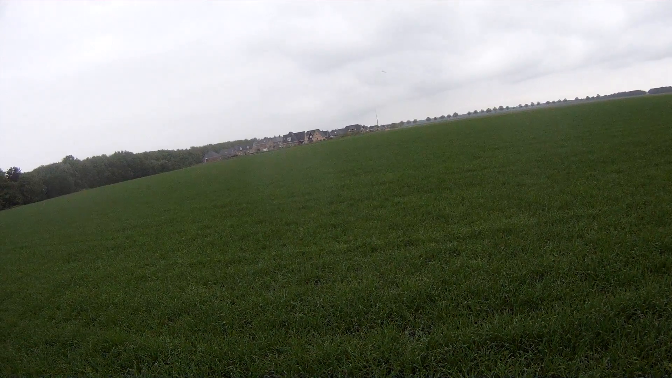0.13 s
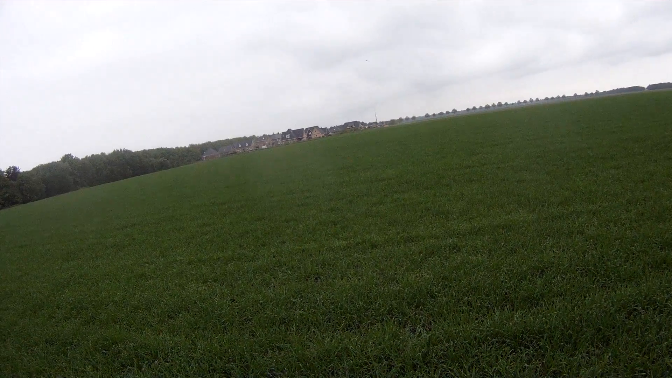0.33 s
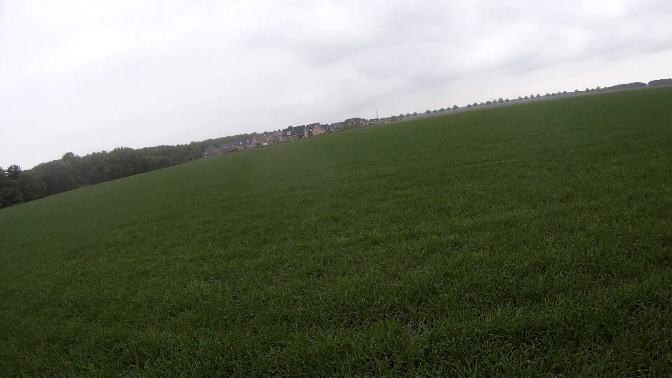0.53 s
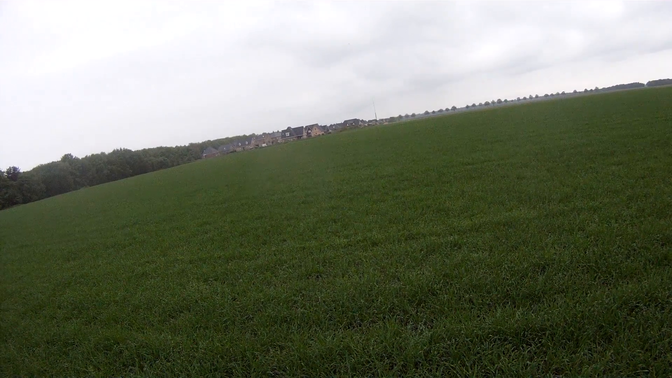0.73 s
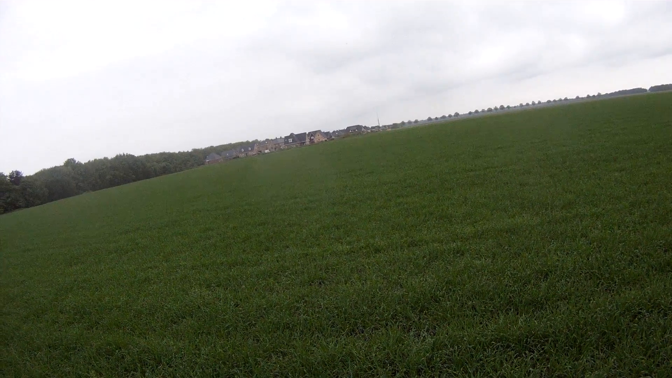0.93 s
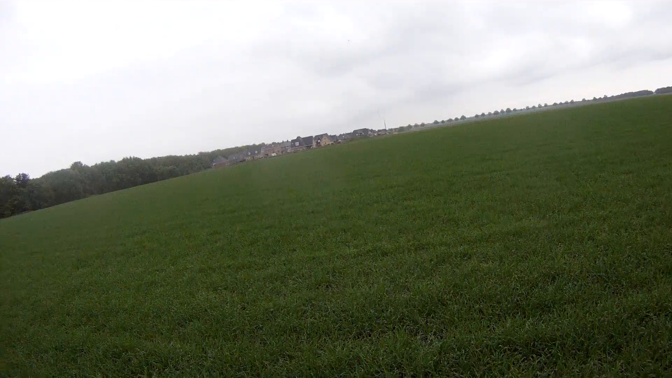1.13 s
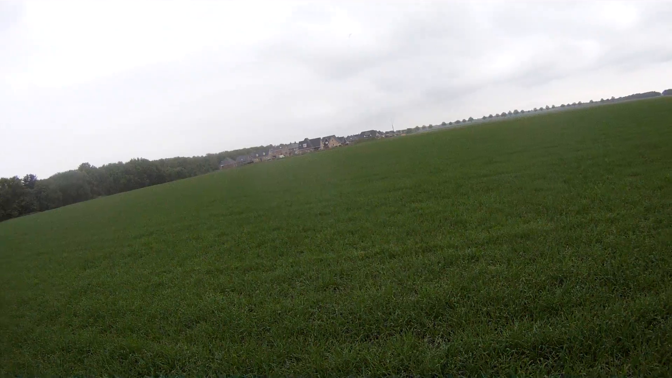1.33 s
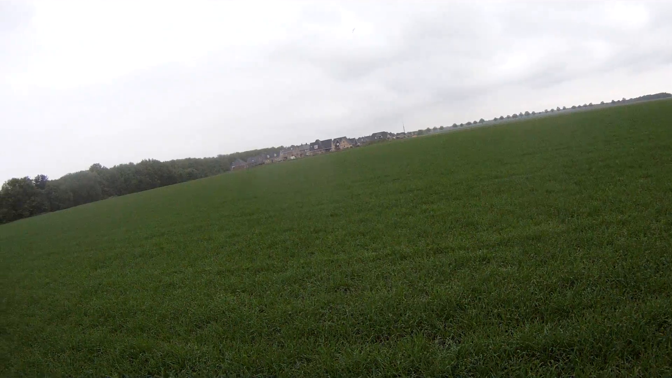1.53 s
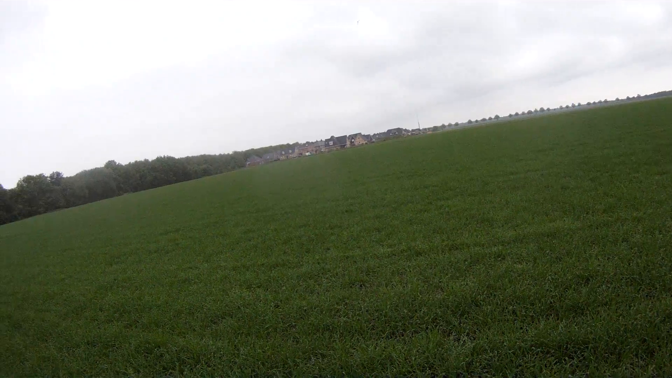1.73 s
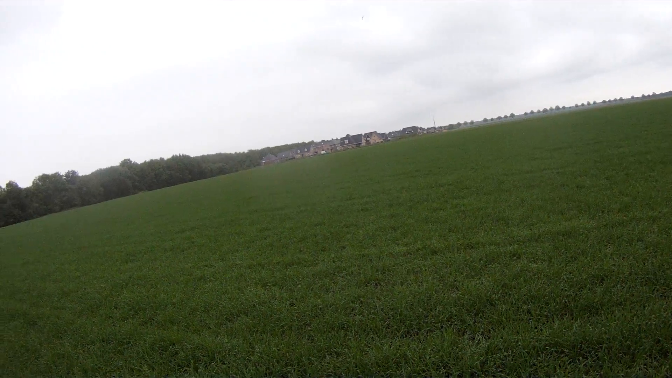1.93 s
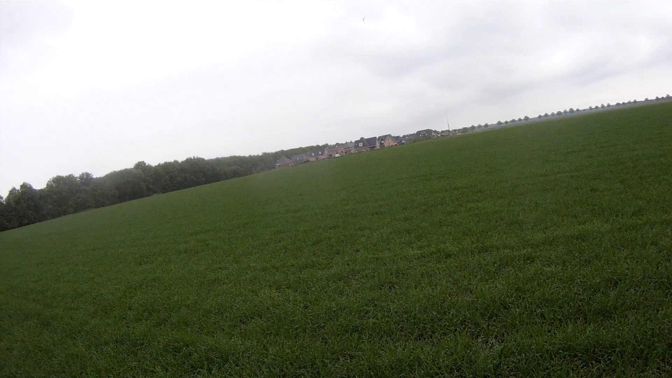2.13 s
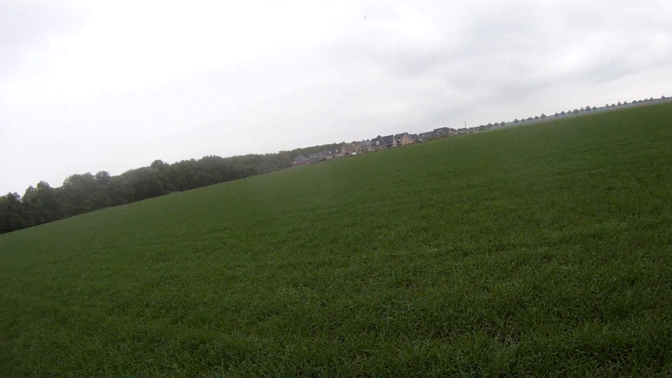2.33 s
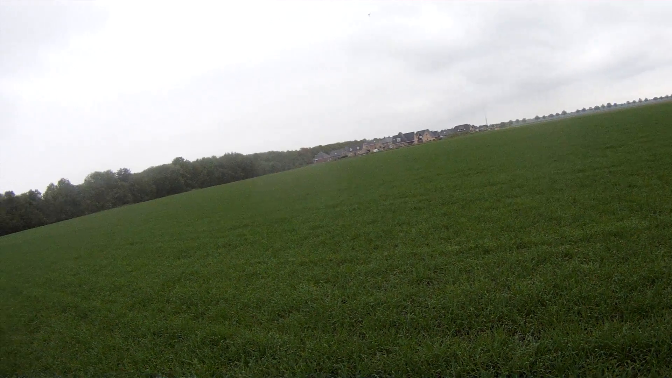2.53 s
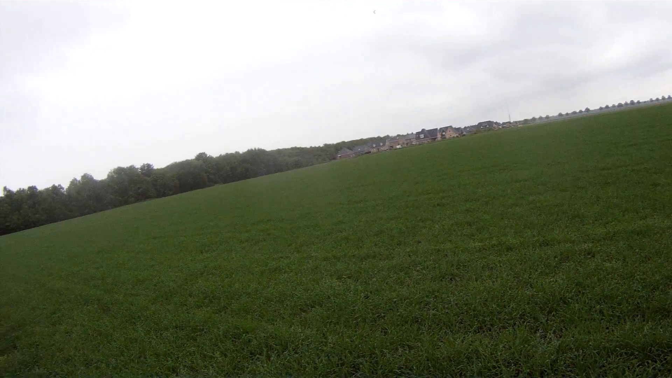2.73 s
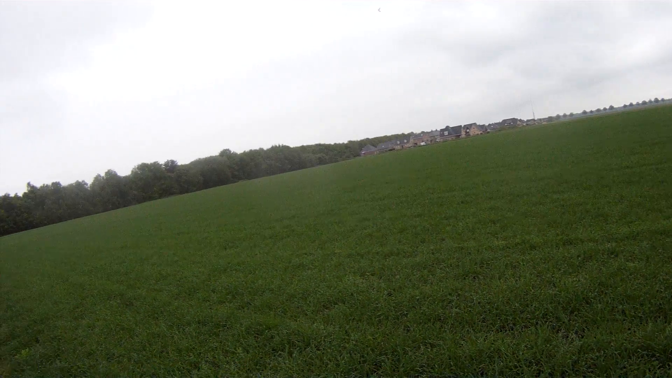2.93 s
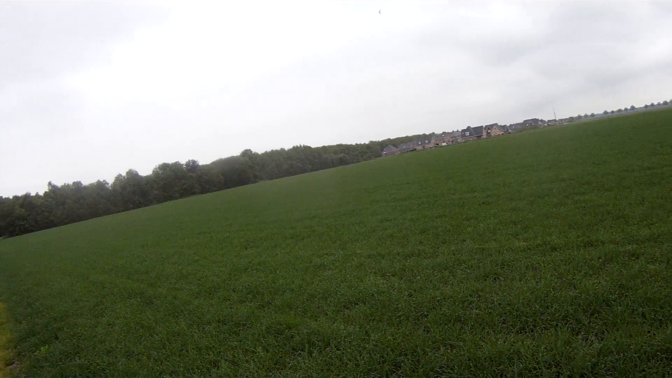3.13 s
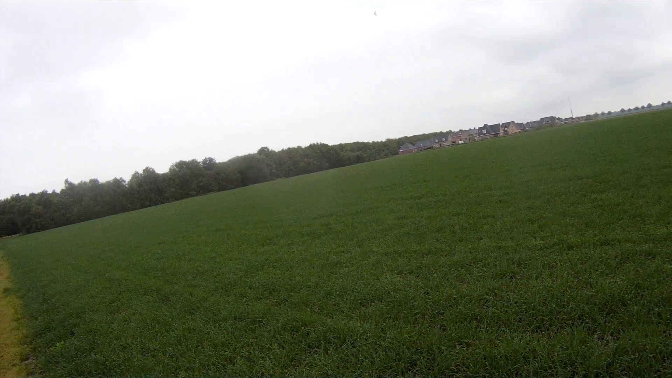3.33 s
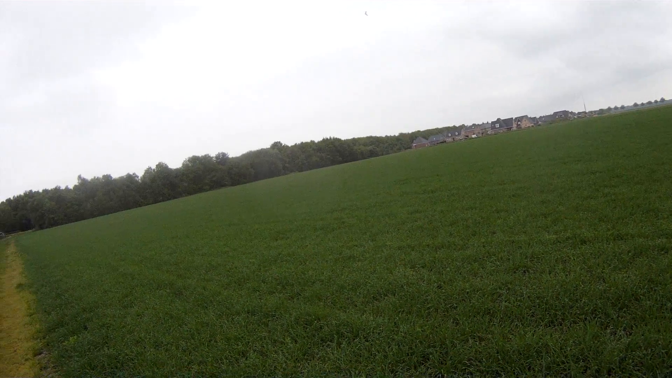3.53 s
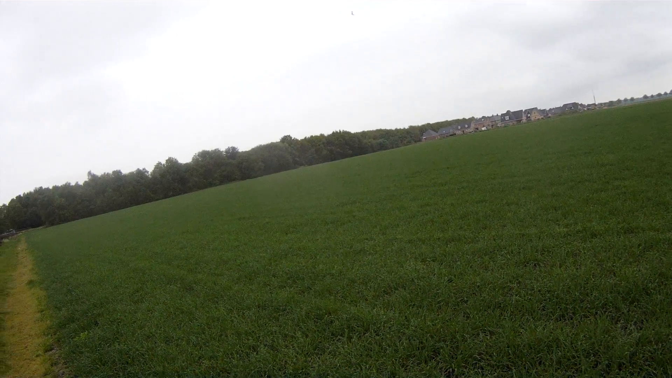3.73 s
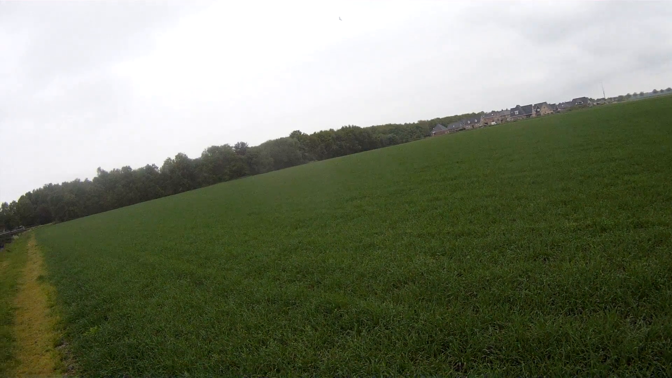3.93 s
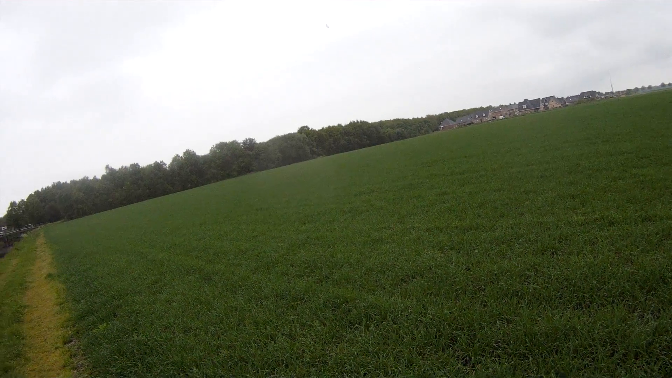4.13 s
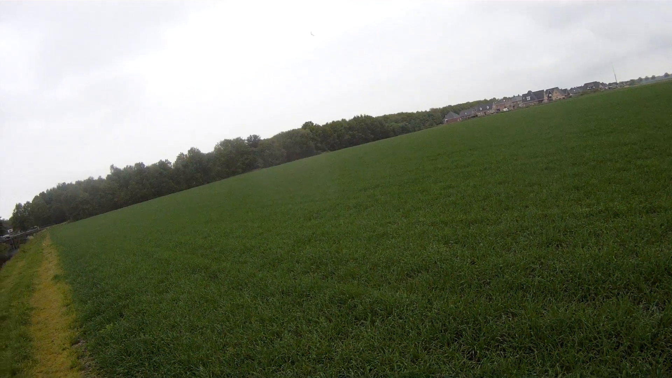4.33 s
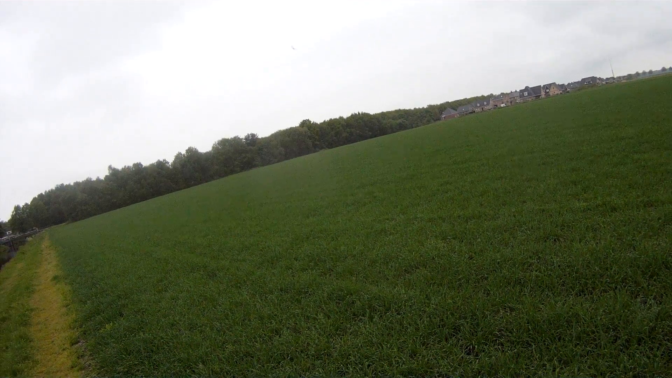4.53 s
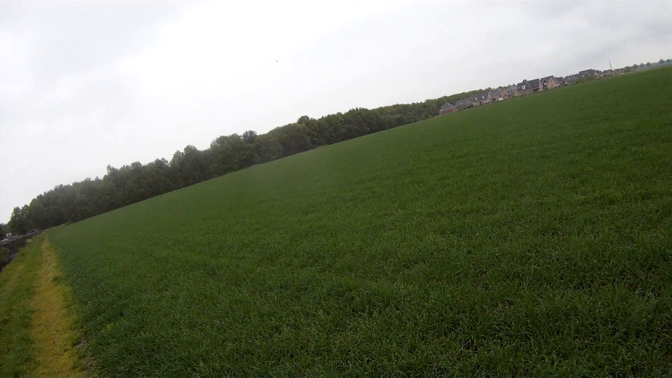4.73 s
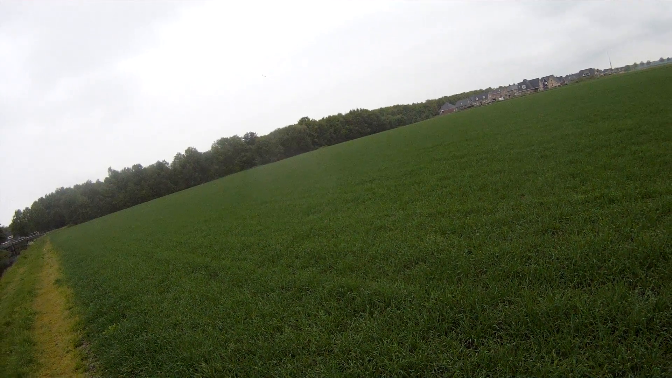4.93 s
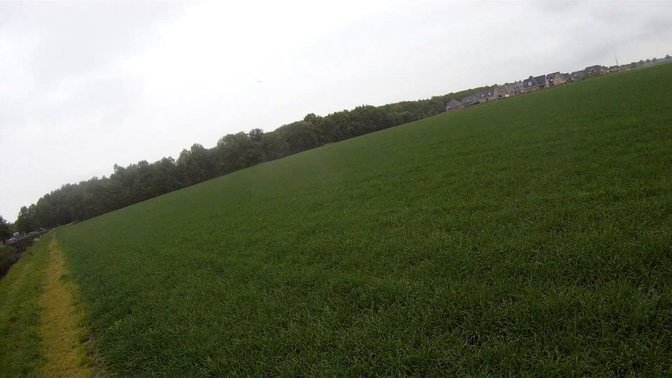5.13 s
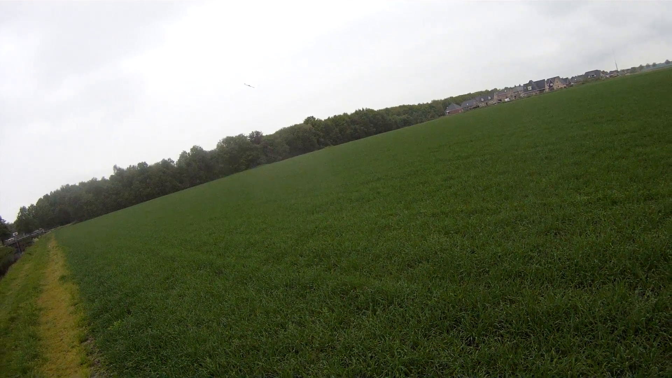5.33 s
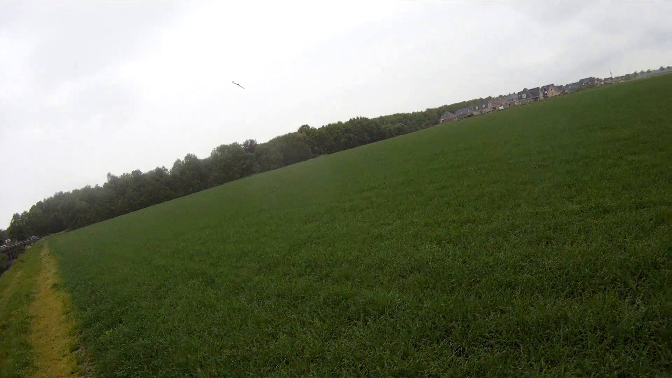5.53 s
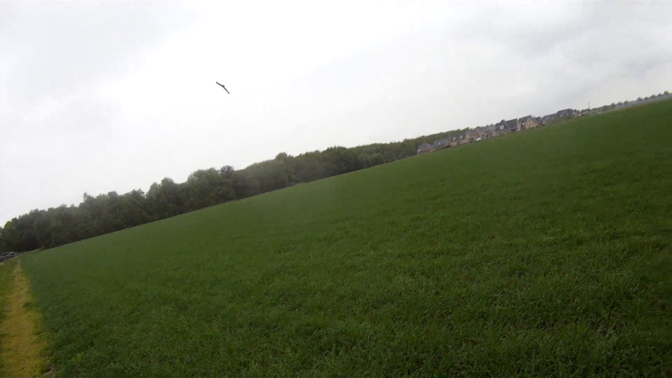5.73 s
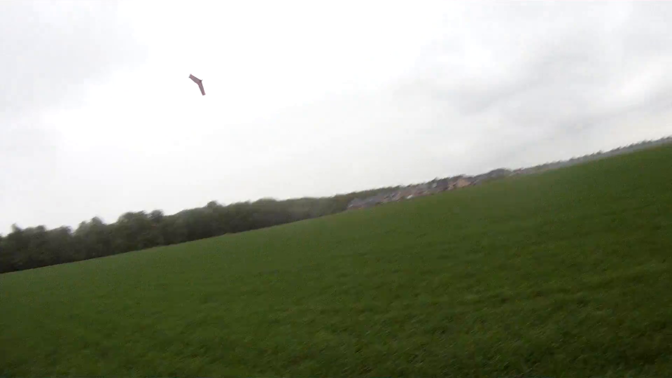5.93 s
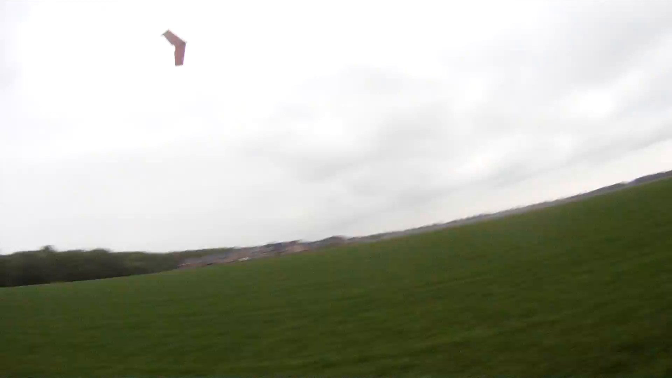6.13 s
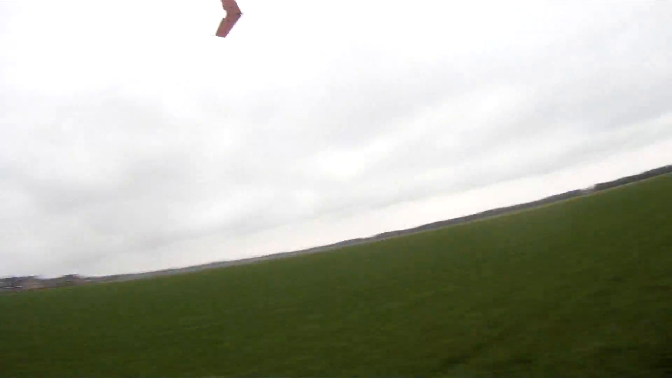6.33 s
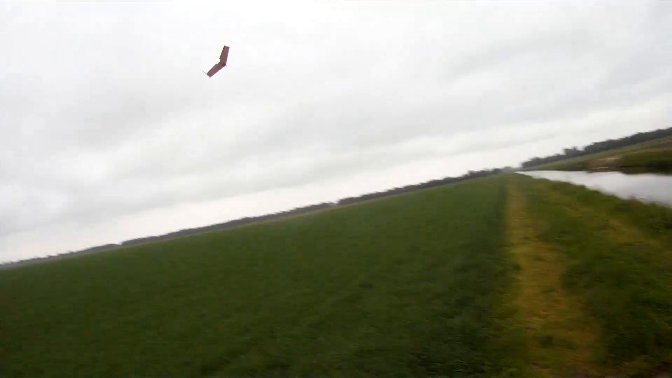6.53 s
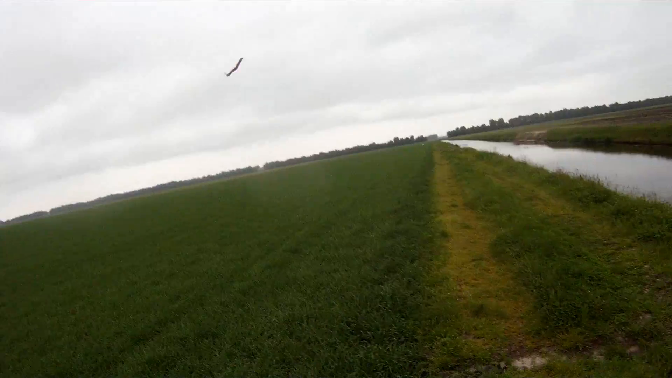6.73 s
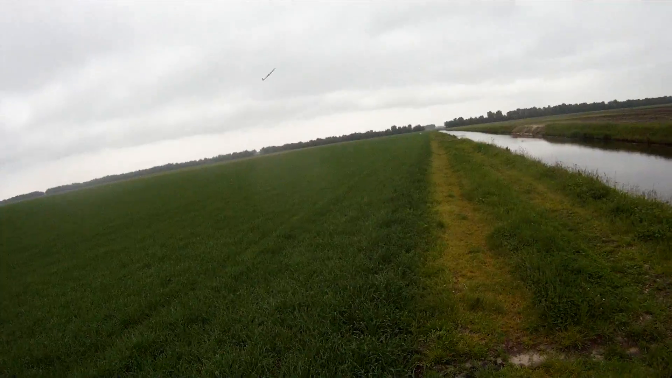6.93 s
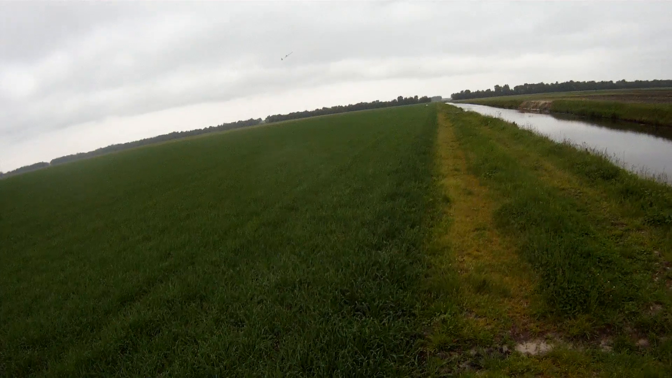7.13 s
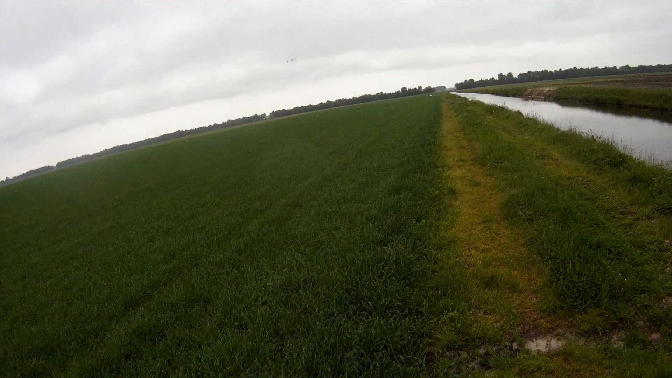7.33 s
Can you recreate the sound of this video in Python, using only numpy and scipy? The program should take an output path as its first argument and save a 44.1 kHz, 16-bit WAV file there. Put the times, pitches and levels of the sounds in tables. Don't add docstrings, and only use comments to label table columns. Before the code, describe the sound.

A far model plane engine drones nasally and waveringly, with a very faint bird whistle around two seconds. The buzz climbs and brightens as the plane approaches, rushes closely overhead with airy hiss, then falls duller and quieter. Dull wind thumps hit the small camera microphone in the open, with coarse metallic treble and no room echo.

```python
import sys
import numpy as np
from scipy import signal
from scipy.fft import rfft, irfft, next_fast_len
from scipy.io import wavfile
from scipy.ndimage import uniform_filter1d, map_coordinates

SR = 44100
rng = np.random.default_rng(int(sys.argv[2]) if len(sys.argv) > 2 else 0)


def wav_record(signal):
    frames = np.transpose(np.atleast_2d(signal))
    bounded = np.clip(frames, -1, 1)
    quanta = np.round(bounded * 32767).astype(np.int16)
    wavfile.write(sys.argv[1], SR, quanta)


def voltage_ratio(decibels):
    exponent = np.asarray(decibels, float) / 20
    return 10 ** exponent


N = 324576
STEP = 64
FAR_DB = -41

# [t/s, level/dB]
BUZZ_LEVEL = [(0.0, -40.5), (0.49, -40.5), (0.63, -44.5), (2.01, -40.5), (2.89, -44), (3.03, -50.5),
              (3.4, -41), (3.65, -42), (4.14, -40), (4.37, -45), (4.53, -40.5), (5.14, -36), (6.31, -21),
              (6.35, -23), (6.79, -27), (7.07, -35), (7.26, -34.5), (7.36, -38.5)]
# [t/s, lag/firing periods, strength/0-1]
GROUND_BOUNCE = [(0, .52, .6), (1.9, .83, .7), (2.1, .88, .65), (2.6, .89, .6), (3.25, .97, .35),
                 (4.35, .975, .55), (4.9, .81, .6), (5.1, .72, .45), (5.55, .84, .55), (5.88, 1.22, .6),
                 (6.02, 1.5, .5), (6.19, 1.86, .5), (6.28, 1.93, .6), (6.37, 1.8, .5), (6.6, 1.26, .45),
                 (6.75, 1, .6), (7, .66, .7), (7.36, .48, .7)]


def unit(x):
    return x / np.sqrt(np.mean(x ** 2) + 1e-20)


def along(points, hz):
    f, v = np.transpose(points)
    return np.interp(np.log(hz + 1), np.log(f + 1), v)


def curves(rows):
    s, *cols = np.transpose(rows)
    return [np.interp(np.arange(N) / SR, s, c) for c in cols]


def wobble(rate):
    knots = rng.standard_normal(int(N * rate / SR) + 4)
    return map_coordinates(knots, [np.arange(N) * rate / SR])


def bumps(rows, height=lambda row: row[1]):
    t = np.arange(0, N, STEP) / SR
    swell = sum(height(r) * np.exp(-((t - r[0]) / r[2]) ** 2) for r in rows)
    return np.interp(np.arange(N), t * SR, swell)


def coloured(x, spectrum):
    m = next_fast_len(N + 8192)
    gain = voltage_ratio(along(spectrum, np.fft.rfftfreq(m, 1 / SR)))
    return irfft(rfft(x, m) * gain, m)[:N]


def rush(spectrum):
    return unit(coloured(rng.standard_normal(N), spectrum))


def field():
    # [f/Hz, level/dB per Hz]
    murmur = [(100, 0), (250, -4), (500, 7.5), (800, 0.5), (1200, -20), (3000, -22), (5500, -22)]
    # [t/s, level/dB]
    murmur_level = [(0, -56.5), (1, -60), (2.3, -57.5), (3.3, -61.5), (5, -60), (7.36, -55.5)]
    # [f/Hz, level/dB per Hz]
    drone = [(40, -32), (65, -5), (78, 6), (92, -6), (140, -25)]
    murmur_db = curves(murmur_level)[0] + 0.6 * wobble(2.74)
    drone_db = -55.5 + 3.8 * wobble(2.316)
    return voltage_ratio(murmur_db) * rush(murmur) + voltage_ratio(drone_db) * rush(drone)


def bird():
    # [t/s, f/Hz, level/dB]
    chirp = [
        (2.06, 2180, -85),
        (2.1, 2190, -68),
        (2.2, 2215, -55),
        (2.225, 2214, -73),
        (2.235, 2215, -95),
    ]
    hz, db = curves(chirp)
    return voltage_ratio(db) * np.sin(2 * np.pi * np.cumsum(hz) / SR)


def wind():
    # [f/Hz, level/dB per Hz]
    buffet_colour = [(15, -4), (30, 1), (80, 2), (120, -17.5), (200, -25.5), (400, -40)]
    # [f/Hz, level/dB per Hz]
    flutter_colour = [(60, -45), (110, 6), (170, -4), (220, -13.5), (400, -33), (1200, -65)]
    # [t/s, buffet level/dB, flutter over buffet/dB]
    breeze_level = [(0, -49, -12), (1.5, -54.5, -10.5), (2.5, -53, -14), (4.5, -48.5, -10.5),
                    (6.3, -50.5, -12.5), (7.36, -43, -5.5)]
    # [t/s, buffet level/dB, half length/s, flutter over buffet/dB]
    gusts = [(0.279, -34, 0.022, -13), (0.474, -58, 0.021, -21), (0.752, -48.5, 0.017, -28),
             (2.6, -53, 0.044, -11), (2.95, -53, .06, -19), (3.103, -44, 0.02, -12.5),
             (3.172, -47, 0.035, -1), (3.26, -40, 0.049, -4.5), (3.42, -43.5, 0.057, -10.5),
             (3.61, -47.5, 0.019, -22), (4.029, -34, 0.038, -10.5), (4.115, -38, 0.036, 2.5),
             (4.194, -42.5, 0.068, -8), (4.713, -50, 0.023, -16), (4.958, -45, .03, -12),
             (5.124, -35.5, 0.037, -6.5), (5.434, -49, 0.089, -4), (5.72, -45, 0.14, -3.5),
             (5.848, -39.5, 0.046, -17), (6.407, -36.5, .02, -9), (6.563, -47, 0.021, -3),
             (6.621, -37.5, .015, -18.5), (6.72, -34, 0.035, -24), (6.823, -39, .03, -20),
             (6.93, -32.5, 0.062, -16), (7.092, -37, 0.036, -9), (7.202, -37.5, 0.021, -13),
             (7.315, -38, 0.066, -12.5)]
    breeze_db, flutter_db = curves(breeze_level)
    breeze = voltage_ratio(breeze_db + 1.6 * wobble(11))
    lumps = 1.2 * wobble(13)
    buffet = unit(voltage_ratio(lumps) * rush(buffet_colour))
    flutter = unit(voltage_ratio(lumps + 2.5 * wobble(30)) * rush(flutter_colour))
    buffet_gain = breeze + bumps(gusts, lambda gust: voltage_ratio(gust[1]))
    flutter_gain = breeze * voltage_ratio(flutter_db) + bumps(gusts, lambda gust: voltage_ratio(gust[1] + gust[3]))
    return buffet_gain * buffet + flutter_gain * flutter


def airframe():
    # [f/Hz, level/dB per Hz]
    whoosh = [(200, -3), (400, 3), (700, 7.5), (1100, -11), (2500, 6), (4000, 18), (5500, -9.5)]
    near_db = uniform_filter1d(curves(BUZZ_LEVEL)[0], size=SR // 4) - FAR_DB
    return voltage_ratio(-66 + 1.62 * near_db + 0.81 * wobble(5.3)) * rush(whoosh)


def shaft(hz):
    # [t/s, share of the pulse lost, delay/periods]
    misfires = [
        (5.165, .35, .03),
        (5.345, .15, .012),
        (6.98, .45, .05),
        (7.011, .5, .07),
    ]
    t = np.arange(N) / SR
    turns = np.cumsum(hz) / SR + .003 * wobble(60) + .006 * wobble(8)
    strength = voltage_ratio(0.59 * wobble(120))
    for s, lost, late in misfires:
        u = (t - s) / 0.0016  # s, about one pulse
        strength *= 1 - lost * np.exp(-u ** 2)
        turns -= late * (1 + np.tanh(u)) / 2
    return turns, strength


def eddies(shape, depth_db, turn, rate):
    knots = rng.standard_normal((2 * shape[0], int(N * rate / SR) + 4))
    where = np.arange(shape[1]) * STEP * rate / SR
    level, phase = np.split(np.array([map_coordinates(k, [where]) for k in knots]), 2)
    return voltage_ratio(depth_db * level) * np.exp(1j * turn * phase)


def exhaust(hz, turns, buzz_db, treble_db):
    # [f/Hz, level/dB]
    silencer = [(900, -49), (1250, -13), (1600, -11), (1880, -7), (2130, 3.5), (2380, -0.5), (2620, -4.5),
                (2870, -3.5), (3150, -1), (3500, -4.5), (4000, -5), (4600, -11), (5200, -12.5),
                (6000, -19.5)]
    # [delay/ms, gain]
    pipe = [(1.1, .12), (1.7, .2), (.45, .12)]
    # [f/Hz, level/dB]
    grass = [(1000, 1.5), (2500, -.5), (5500, -5)]
    lag, share = (c[::STEP] for c in curves(GROUND_BOUNCE))
    order = np.arange(5, 27)[:, None]
    f = order * hz[::STEP]
    echoes = sum(g * np.exp(-2j * np.pi * f * ms / 1000) for ms, g in pipe)
    gain = voltage_ratio(along(silencer, f)) * (1 + echoes)
    bounce = share * voltage_ratio(along(grass, f)) * np.exp(-2j * np.pi * order * lag)
    gain = gain * (1 + bounce * eddies(f.shape, 2.5, .55, 7))
    gain = gain * eddies(f.shape, 1.3, .7, 1.5) * eddies(f.shape, 1.9, .18, 12)
    near = voltage_ratio(buzz_db - buzz_db.max())[::STEP]
    gain = gain * voltage_ratio(4.5 * near * np.exp(-((f - 3260) / 580) ** 2))

    def band(lo, hi):
        power = np.sum(abs(gain) ** 2 * (f > lo) * (f < hi), axis=0) / 2
        return np.sqrt(uniform_filter1d(power, size=60))

    gain /= band(1700, 4000)
    treble_part = along([(2500, 0), (3300, 0.043), (4200, 0.67)], f)
    gain *= (voltage_ratio(treble_db[::STEP] + 1.0) / band(4000, 9900)) ** treble_part
    low_mid_part = along([(1650, 0.16), (1850, 0.088)], f)
    gain *= (voltage_ratio(-17.5) / band(1100, 1870)) ** low_mid_part
    n = np.arange(N)
    buzz = 0
    for k, g in zip(order[:, 0], gain):
        angle = 2 * np.pi * k * turns
        real, imag = np.interp(n, n[::STEP], g.real), np.interp(n, n[::STEP], g.imag)
        buzz = buzz + real * np.cos(angle) - imag * np.sin(angle)
    return voltage_ratio(buzz_db) * buzz


def low_orders(turns, ahead, lag):
    # [t/s, level/dB]
    hum = [(0, -42), (1.3, -50.5), (2.9, -50.5), (3.6, -50.5), (4.3, -46.5), (4.75, -42.5), (5.3, -41),
           (5.7, -38), (6.2, -29.5), (6.5, -27.5), (6.75, -34), (7.1, -40), (7.36, -44.5)]
    # [level over the hum/dB, extra ahead of the nose/dB, phase turned by the grass/rad]
    orders = [
        (-1.5, 2.5, 0.01),
        (0.5, 1.5, 0.14),
        (-6, -2, 0.0088),
        (-10.5, 0.5, 0.01),
    ]
    # [t/s, loss/dB, half length/s]
    banking = [
        [(2.7, -9, 0.89), (3.25, -20, 0.21), (4.1, -4.5, 0.53), (4.9, -13.5, 0.45), (6.45, -6.5, .2)],
        [(1.05, -12, 0.53), (5.9, -4.5, 0.33), (7, -6.5, 0.13)],
        [(.12, -12, 0.15), (1.6, -9.5, 0.75), (2.9, -10, 0.52), (4.5, -8, .3), (5.9, -3.5, 0.26)],
        [(3.1, -6, 0.36), (6.6, -3, 0.52)],
    ]
    hum_db = curves(hum)[0]
    low = 0
    for k, ((db, ahead_db, turn), hidden) in enumerate(zip(orders, banking), 1):
        angle = 2 * np.pi * k * turns + 0.38 * k
        both_paths = np.cos(angle) + 0.71 * np.cos(angle - 2 * np.pi * k * lag - turn)
        order_db = hum_db + db + bumps(hidden) + ahead_db * ahead + 0.85 * wobble(4.31)
        low = low + voltage_ratio(order_db) * both_paths
    return low


def gas_rush(hz, turns, buzz_db, ahead, facing, lag, share):
    # [f/Hz, level/dB per Hz]
    roar_colour = [(300, 21.5), (700, 6), (1300, 6), (2200, 32.5), (3500, 24.5), (5500, -17)]
    # [f/Hz, level/dB]
    dull = [(2500, 0), (3800, -1), (5500, -6)]
    puff = 1 + 0.34 * np.cos(2 * np.pi * turns - .8)
    roar = unit(puff * rush(roar_colour))
    roar = facing * roar + (1 - facing) * coloured(roar, dull)
    n = np.arange(N)
    bounced = np.interp(n - lag / hz * SR, n, roar)
    roar = (roar + share * bounced) / np.sqrt(1 + share ** 2)
    gas_db = uniform_filter1d(buzz_db, size=SR // 8) - 17.5 - 5 * (1 - ahead ** 2) + 1.2 * wobble(6)
    return voltage_ratio(gas_db) * roar


def engine():
    # [t/s, firing rate heard f/Hz]
    flight = [(0, 240.6), (.45, 235.8), (1.56, 234.4), (1.8, 230.7), (2.05, 229.9), (2.52, 230.5),
              (2.91, 237.3), (3.05, 234.1), (3.4, 240.7), (3.73, 249.3), (4.53, 269.4), (4.8, 280.3),
              (5.1, 284.9), (5.7, 275.3), (5.9, 265.9), (6.15, 261.8), (6.48, 240.3), (7.36, 236)]
    # [t/s, change of rate/Hz, half length/s]
    surges = [(.92, -1, 0.075), (1.094, 1, 0.032), (1.324, 1, 0.064), (1.626, 0.7, 0.042),
              (2.087, 0.8, 0.058), (3.077, 1.65, 0.042), (3.197, -1, 0.049), (3.864, -1.27, 0.034),
              (4.605, 2.07, 0.046), (4.793, 1.5, .04), (2.255, 3, .12), (2.668, 2, 0.073),
              (4.17, .5, 0.081), (5.022, -1, 0.033), (5.104, 2, 0.034), (5.29, 2.3, 0.054),
              (5.62, 0.5, 0.043), (5.701, .5, .02), (5.99, 0.5, .06), (6.197, 1, 0.049), (6.357, -1, 0.038),
              (6.687, -1, 0.1245), (6.773, 0, 0.018), (6.836, -1, 0.037), (7.035, -7, .04),
              (7.11, -1.5, 0.042), (7.271, 1, 0.052)]
    # [t/s, angle/degrees]
    heading = [(0, 160), (1.4, 140), (2.5, 105), (3.18, 90), (4.2, 58), (4.6, 30), (5.5, 20), (6.15, 38),
               (6.3, 65), (6.47, 110), (6.8, 145), (7.36, 155)]
    # [t/s, level/dB, half length/s]
    buzz_swells = [(.94, 0.5, 0.087), (1.106, 1, 0.033), (1.28, 1.5, 0.13), (1.86, 2, 0.12), (2.337, 0, 0.046),
                   (2.55, 3.5, 0.094), (3.721, -2.5, .05), (3.849, 1.5, 0.05), (4.923, 0, .05),
                   (5.6, -1.5, 0.027), (5.67, -2.5, 0.017), (5.709, 2, 0.013), (5.753, -1.5, .02),
                   (6.221, 0, 0.037), (6.301, 0.5, 0.029), (6.77, -1, 0.021)]
    hz = curves(flight)[0] + bumps(surges)
    buzz_db = curves(BUZZ_LEVEL)[0]
    ahead = np.cos(np.radians(curves(heading)[0]))
    lag, share = curves(GROUND_BOUNCE)
    facing = (1 + np.tanh((ahead - 0.63) / 0.17)) / 2
    treble_db = -13.5 + 12 * facing + 0.21 * (buzz_db - FAR_DB)
    turns, strength = shaft(hz)
    buzz_db = buzz_db + bumps(buzz_swells)
    pulses = exhaust(hz, turns, buzz_db, treble_db) + low_orders(turns, ahead, lag)
    return strength * pulses + gas_rush(hz, turns, buzz_db, ahead, facing, lag, share)


def scene():
    return (field() + bird() + wind() + airframe() + engine())[None]


def low_pass(x):
    return signal.sosfilt(signal.butter(12, 16640, fs=SR, output="sos"), x)


def record(dry):
    # [f/Hz, level/dB]
    input_filter = [(4800, 0), (5500, 2.5), (5800, -1), (6000, -19)]
    # [f/Hz, level/dB]
    band_limit = [(14500, 0), (15250, -3), (15400, -50), (16600, -60)]
    filtered = coloured(dry[0], input_filter + [(6300, -90)])
    slow = signal.resample_poly(filtered, 160, 147)[::4]
    held = signal.resample_poly(np.repeat(slow, 4), 147, 160)[:N]
    return low_pass(coloured(held, band_limit)[None])


dry = scene()
out = record(dry)
wav_record(out)
```